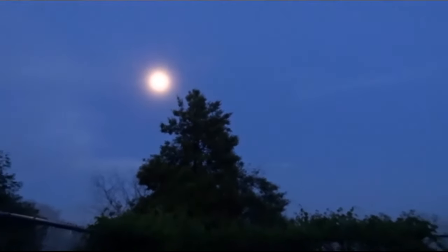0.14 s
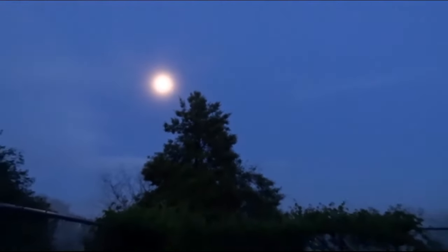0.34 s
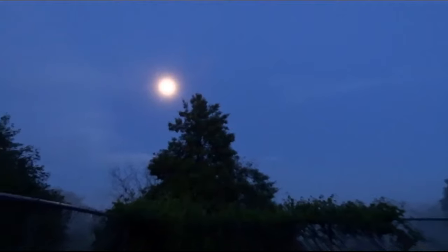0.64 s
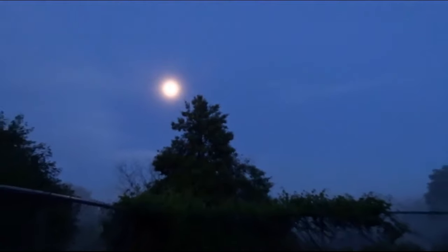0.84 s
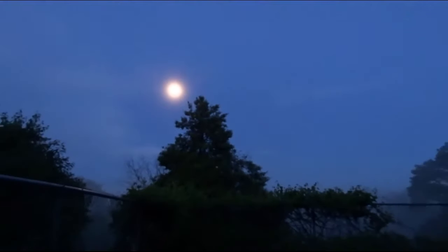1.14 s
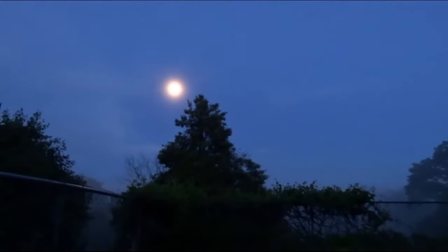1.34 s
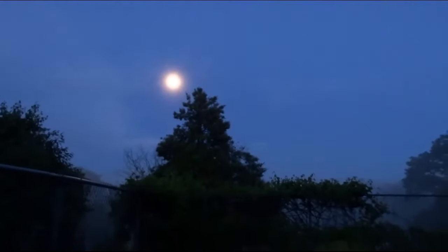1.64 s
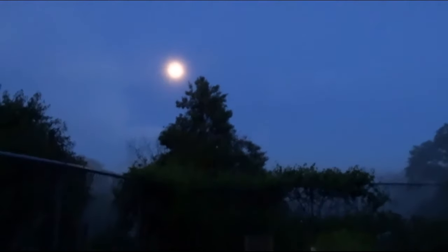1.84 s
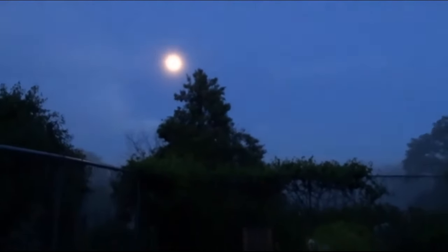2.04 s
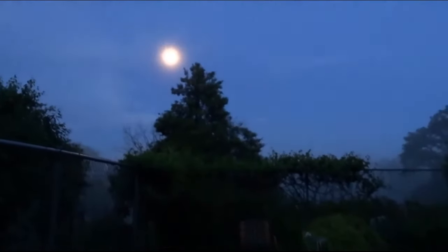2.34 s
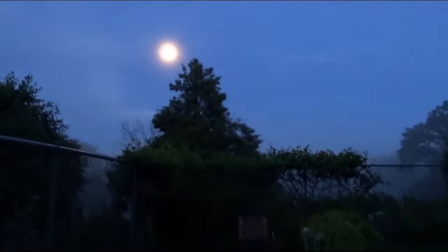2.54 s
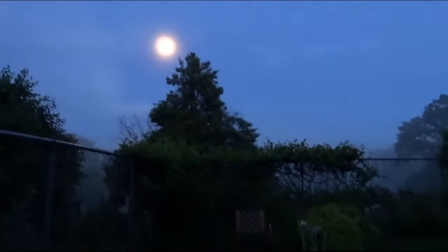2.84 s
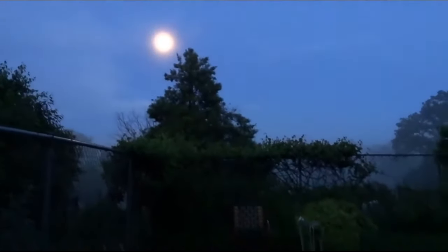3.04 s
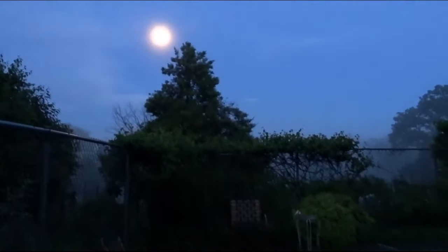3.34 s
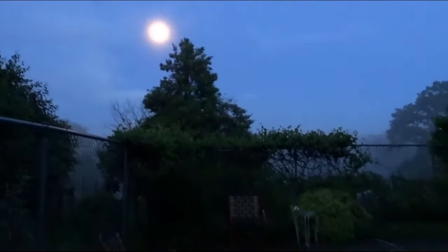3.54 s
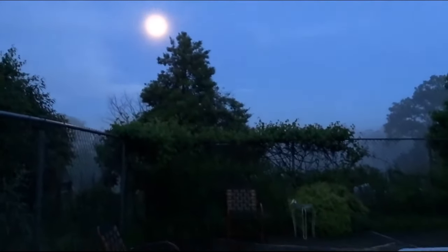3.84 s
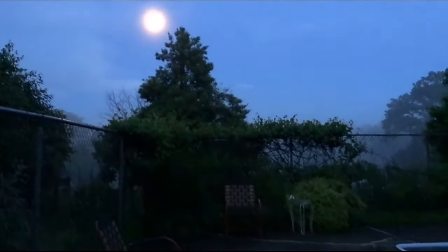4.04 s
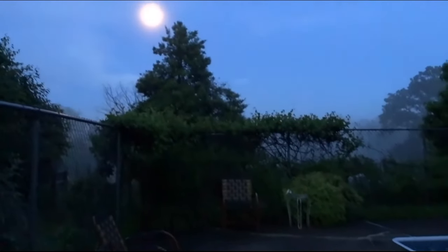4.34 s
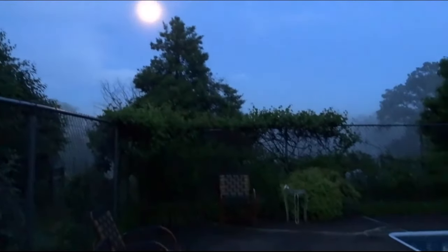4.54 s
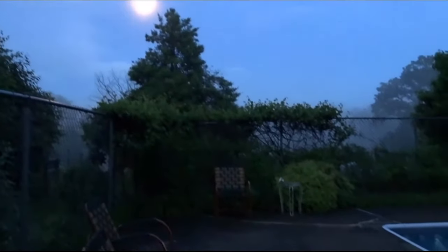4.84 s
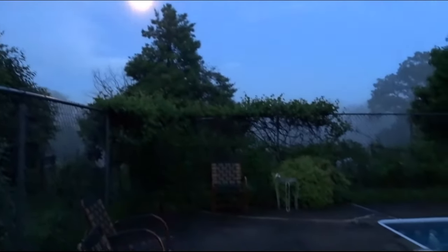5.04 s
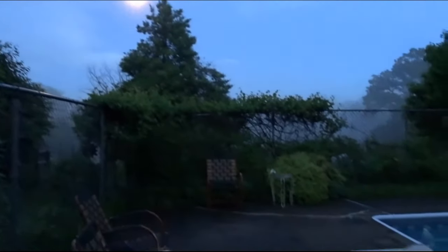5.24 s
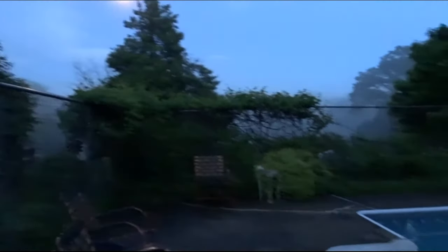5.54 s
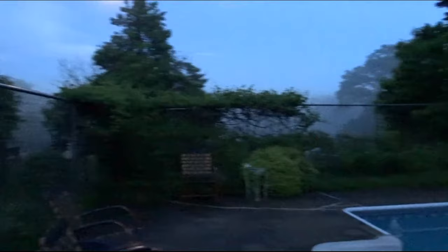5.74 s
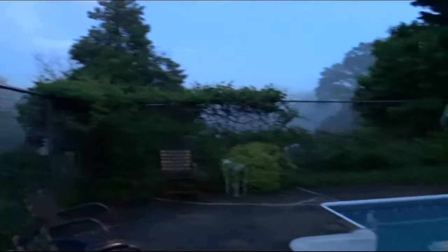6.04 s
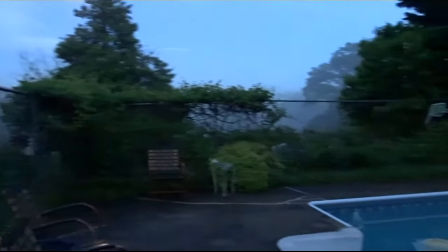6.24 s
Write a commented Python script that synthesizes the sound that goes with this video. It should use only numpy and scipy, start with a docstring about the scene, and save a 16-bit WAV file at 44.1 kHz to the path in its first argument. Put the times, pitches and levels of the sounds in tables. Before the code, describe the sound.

A faint, steady chorus of toads trills throughout, outdoors at dusk and slightly to the left, each trill a fast train of short rising pulses. Behind it are a high shimmer of far crickets and a low hum of distant traffic and machinery. One close cricket trills in four long runs, strongest from 4.3 to 6.2 seconds. A camera's zoom motor whirs softly from the start until 1.6 seconds. Between 1.3 and 1.9 seconds fingers knock lightly and rub on the camera body, with one tiny squeak near 1.7. The chorus swells a little around 1.9 seconds. Nearer toads stand out in short trills from 0.5 seconds, then in one long, louder trill from 2.9 to 5, followed by a brief lower one. Another cricket adds scattered single scrapes from 3 to 5.3 seconds. The chorus continues to the end at about 6.4 seconds.

```python
"""Toads trill together beyond a backyard at dusk, a few nearer voices pulsing out of the chorus.
Each trill is a train of short, rising pulses. One cricket scrapes its wings close by over many far
ones; machinery and traffic hum in the distance. A camera's zoom motor whirs at first, and fingers
tick, rub and squeak on the body as it stops. Levels in the tables are relative."""
import sys
import numpy as np
from scipy import signal
from scipy.fft import rfft, irfft
from scipy.io import wavfile
from scipy.ndimage import uniform_filter1d

SR = 44100
rng = np.random.default_rng(int(sys.argv[2]) if len(sys.argv) > 2 else 0)


def generate_wav(sig):
    """Save sig (samples, or channels by samples) to the path in sys.argv[1] as 16-bit PCM at SR."""
    pcm = np.round(np.clip(np.atleast_2d(sig).T, -1, 1) * 32767).astype(np.int16)
    wavfile.write(sys.argv[1], SR, pcm)


N = 281358
TIME = np.arange(N) / SR


def amp(db):
    """Decibels to gain."""
    return 10 ** (np.asarray(db) / 20)


def unit(x):
    """Scales to rms 1."""
    return x / np.sqrt(np.mean(x ** 2) + 1e-20)


def curve(rows, column=1):
    """One column of a time table as an automation curve."""
    rows = np.array(rows, float)
    return np.interp(TIME, rows[:, 0], rows[:, column])


def eq(points, hz):
    """Reads a spectrum table on a log-frequency axis."""
    f, value = np.transpose(points)
    return np.interp(np.log(hz + 1), np.log(f + 1), value)


def add(mix, start_s, sound):
    """Mixes a sound in at its cue."""
    part = mix[max(round(start_s * SR), 0):][:len(sound)]
    part += sound[:len(part)]


def bump(progress):
    """A smooth fade in and out as progress runs from 0 to 1."""
    return np.sin(np.pi * np.clip(progress, 0, 1)) ** 2


def drift(hz):
    """Random modulation of rms 1, rolling off above hz."""
    f = np.fft.rfftfreq(N, 1 / SR)
    return unit(irfft(rfft(rng.standard_normal(N)) * np.exp(-(f / hz) ** 2) * (f > 0), N))


def pan(left_db):
    """Stereo gains that put the left side left_db above the right."""
    half = np.atleast_1d(left_db) / 2
    return amp(np.array([half, -half]))


# Stereo width at the two microphone ports: freq_hz, correlation
PORT_LIKENESS = [(50, 1), (130, .98), (330, .68), (700, .77), (1200, .86), (2200, .86), (4300, .9),
                 (8000, .75), (11000, .55)]
# Their balance: freq_hz, left_minus_right_db
PORT_BALANCE = [(60, .2), (300, 1.2), (700, 2), (1500, 3), (4300, 2), (8000, .5)]

def noise(spectrum):
    """Coloured stereo noise of rms 1, as the two ports hear it."""
    hz = np.fft.rfftfreq(N, 1 / SR)
    left, other = rfft(rng.standard_normal((2, N)))
    likeness = eq(PORT_LIKENESS, hz)
    right = likeness * left + np.sqrt(1 - likeness ** 2) * other
    stereo = np.array([left, right]) * pan(eq(PORT_BALANCE, hz))
    return unit(irfft(stereo * amp(eq(spectrum, hz)), N))


def garden(x, wet_db, t60_s, width, count=3):
    """The direct sound plus scatter from trees and fence, which shifts as the camera moves."""
    t, wet = np.arange(SR // 3) / SR, 0
    for k in range(count):
        taps = rng.standard_normal((2, len(t))) * amp(-60 * t / t60_s) * (t > .002)
        mid, side = taps / np.linalg.norm(taps, axis=1, keepdims=True)
        tails = np.array([mid + width * side, mid - width * side])
        crossfade = np.sqrt(2 / count) * np.cos(np.pi * (2 * TIME + k / count))
        wet = wet + signal.oaconvolve((x * crossfade)[None], tails, axes=1)[:, :N]
    return (x + amp(wet_db) * wet) / np.sqrt(1 + amp(wet_db) ** 2)


def leveller(x, window=14001):
    """Evens out the slow level of a crowd and keeps its pulsing."""
    power = uniform_filter1d(uniform_filter1d(x.mean(0) ** 2, window), window // 2)
    return x / np.sqrt(abs(power) + 1e-12)


# Bed of distant traffic and night air: freq_hz, density_db
AIR_EQ = [(15, -31), (35, -5.5), (65, -5.5), (120, 1.5), (155, -5.5), (205, -6), (280, -12.5), (410, -18),
          (600, -10), (770, -7), (950, -19.5), (1500, -20.5), (2800, -27), (5800, -34), (11000, -38)]
# Swell of the traffic: time_s, level_db
TRAFFIC_SWELL = [(0, 0), (.7, 1), (1.35, 3), (1.6, 4.5), (2.2, 1.5), (3.2, 2), (4, 1), (4.5, 3), (5.5, 3.5),
                 (6.38, 1)]
# Hum of far machinery: pitch_hz, level_db
HUM_TONES = [(91, -81), (115, -72), (240, -73)]
# Swell of its deepest tone: time_s, level_db
DRONE_SWELL = [(0, -62.5), (1, -59), (1.7, -67), (2.4, -59), (2.9, -73), (3.4, -71), (3.8, -75), (4.2, -71),
               (4.7, -62.5), (5.4, -55.5), (6.38, -61)]

def town(drone_hz=47.3):
    """Traffic wash, a deep drone and a few wavering machine tones."""
    def tone(hz, wobble_rad):
        return unit(np.sin(2 * np.pi * hz * TIME + wobble_rad * drift(2.8)))

    wash = amp(-58 + curve(TRAFFIC_SWELL) + 1.18 * drift(28)) * noise(AIR_EQ)
    drone = amp(curve(DRONE_SWELL) + 1.3 * drift(3.7)) * tone(drone_hz, .84)
    hum = sum(amp(db) * tone(hz, .59) for hz, db in HUM_TONES)
    return wash + drone + hum


# Bed of far crickets: freq_hz, density_db
FAR_CRICKET_EQ = [(3000, -41), (3650, -16), (3950, -3), (4350, -2), (4700, -8), (5150, -22.5), (6200, -56),
                  (7500, -27), (8300, -19.5), (9200, -50)]

def far_crickets():
    """Many distant trills melt into a shimmering band."""
    return amp(-59.5 + .5 * drift(18) + drift(50)) * noise(FAR_CRICKET_EQ)


# Colour of the whir: freq_hz, density_db
MOTOR_EQ = [(400, -6), (1500, -8), (2800, -1.5), (4800, -35), (5500, -4), (6300, -11.5), (6900, -1),
            (7500, -6), (8040, 3.5), (8700, -5.5), (9450, -11), (10200, -8), (11000, -19)]
# The motor runs, then cuts out: time_s, level_db
MOTOR_FADER = [(0, -64), (1.1, -64.5), (1.5, -62), (1.56, -75), (1.6, -120)]

def zoom_motor(flutter_hz=67):
    """A small gear train whirs, fluttering as it turns."""
    flutter = 1 + .18 * np.sin(2 * np.pi * flutter_hz * TIME + drift(1.4))
    return amp(curve(MOTOR_FADER)) * flutter * noise(MOTOR_EQ)


# Finger cues: start_s, knock_db, scrape_db, scrape_length_s
TOUCHES = [(1.349, -44, -73, .01), (1.403, -41, -71, 0.0073), (1.485, -46, -75, .01),
           (1.639, -44.5, -67, 0.0085), (1.646, -57, -45, 0.0057), (1.669, -58, -61, 0.08),
           (1.706, -57, -54, 0.089), (1.751, -44.5, -66, 0.0065), (1.814, -59, -55, 0.017),
           (1.837, -61, -54, 0.017), (1.865, -58, -47, 0.0088)]
# Ring of the camera body: pitch_hz, level_db, t60_s
BODY_MODES = [(583, -8, 0.044), (783, 2, 0.023), (850, -6, 0.023), (1380, -27, .015)]
# Colour of a scrape: freq_hz, density_db
SCRAPE_EQ = [(200, 7), (800, 3), (1700, 4.5), (2700, 7), (3700, -2.5), (5200, 1.5), (6200, -4.5),
             (8000, 4.5), (9500, -7.5), (11000, -11)]

def fingers(attack_s=.0042):
    """Each touch knocks the camera body and scrapes over it in small slips."""
    knocks, pressure = np.zeros((2, N))
    t = np.arange(SR // 8) / SR
    ring = sum(amp(db - 60 * t / t60_s) * np.sin(2 * np.pi * hz * t) for hz, db, t60_s in BODY_MODES)
    ring *= 1 - np.exp(-t / attack_s)
    for start_s, knock_db, scrape_db, length_s in TOUCHES:
        add(knocks, start_s, amp(knock_db + 8.5) * ring)
        add(pressure, start_s, amp(scrape_db) * bump(t / length_s))
    slips = amp(2.7 * drift(290))
    return knocks + pressure * slips * noise(SCRAPE_EQ)


# Colour of a fingertip squeak: freq_hz, density_db
SQUEAK_EQ = [(2600, -18), (3200, -2), (3750, 2), (4200, 1), (5000, -19)]

def squeak(start_s=1.668, level_db=-50, length_s=.036):
    """A short, rough squeal of skin on plastic."""
    return amp(level_db) * bump((TIME - start_s) / length_s) * noise(SQUEAK_EQ)


# Loudest strokes of a stray cricket: time_s, level_db
STRAY_STROKES = [(3.004, -54), (3.683, -53), (4.088, -53), (4.289, -52), (4.606, -52), (4.694, -50),
                 (4.945, -56), (5.329, -55)]

def stray_cricket(length_s=.0166, top_hz=5150, end_hz=4150, faint_per_s=9, faint_db=-55.5):
    """Single rough wing strokes sweep down; fainter ones fall at random among the loudest."""
    out, progress = np.zeros(N), np.linspace(0, 1, int(length_s * SR))
    sweep_hz = top_hz + (end_hz - top_hz) * progress
    stroke = bump(progress) * np.sin(2 * np.pi * np.cumsum(sweep_hz) / SR)
    first_s, last_s = STRAY_STROKES[0][0], STRAY_STROKES[-1][0]
    span_s = last_s - first_s
    draws = rng.random((64, 2))[:round(faint_per_s * span_s)]
    faint = [(first_s + when * span_s, faint_db + 4 * (force - .5)) for when, force in draws]
    for time_s, level_db in STRAY_STROKES + faint:
        add(out, time_s - .004, amp(level_db) * stroke)
    grit = amp(3 * drift(400))
    return garden(out * grit, wet_db=-8, t60_s=.13, width=.4) * pan(2.5)


# Close cricket cues: start_s, end_s, strokes_per_s, wing_db, rasp_start_db, rasp_end_db
CRICKET_TRILLS = [(.156, 1.9, 35.74, -63.5, -78, -76.5), (1.918, 3.29, 35.02, -60, -69.5, -71.5),
                  (3.448, 4.21, 36.42, -62.5, -70.5, -78), (4.27, 6.21, 35.84, -56.3, -72.5, -72)]
# Rasp of its file: freq_hz, density_db
RASP_EQ = [(7000, -46), (7550, -18), (7800, -6), (8150, -3.5), (8450, 4.5), (8720, 2.5), (8950, -8),
           (9400, -44)]

def near_cricket(duty=.6, top_hz=4520, fall=.14, attack_s=.014, release_s=.055):
    """Each wing stroke rings and slows, so that its pitch falls; the file rasps an octave up."""
    cycle, wing_gain, rasp_gain = np.zeros((3, N))
    for start_s, end_s, rate, wing_db, *rasp_db in CRICKET_TRILLS:
        gate = np.clip(np.minimum((TIME - start_s) / attack_s, (end_s - TIME) / release_s), 0, 1)
        cycle += (gate > 0) * ((TIME - start_s) * rate % 1)
        wing_gain += gate * amp(wing_db)
        rasp_gain += gate * amp(np.interp(TIME, [start_s, end_s], rasp_db))
    progress = np.minimum(cycle / duty, 1)
    swell = unit(bump(progress ** .85)) * amp(.8 * drift(18))
    jitter = .009005 * drift(491) + .008 * drift(29.87)
    pitch_hz = top_hz * (1 - fall * progress ** 1.2 + jitter)
    phase = 2 * np.pi * np.cumsum(pitch_hz) / SR
    wings = amp(4) * wing_gain * swell * (np.sin(phase) + amp(-27) * np.sin(2 * phase))
    flicker = amp(1.3 * drift(20))
    rasp = rasp_gain * flicker * unit(swell + 3.6) * noise(RASP_EQ)  # pulses only shallowly
    return garden(wings, wet_db=-4.5, t60_s=.092, width=.57) * pan(2.6) + rasp


# Swell of both distant toad layers: time_s, main_note_db, low_note_db, main_pitch_hz
CHORUS = [(0.1, -54.5, -63, 2107), (0.45, -54.5, -66.5, 2137), (0.7, -52.5, -60.5, 2121),
          (1.05, -52.5, -57, 2129), (1.55, -54.5, -59, 2110), (1.87, -49, -56, 2135),
          (2.1, -49.5, -55.5, 2121), (2.7, -51, -56, 2121), (3.1, -49, -58.3, 2157),
          (3.55, -49.5, -58, 2183), (4.15, -51, -63, 2164), (4.5, -48, -56.5, 2113),
          (4.85, -48, -56.3, 2122), (5.2, -51.5, -58, 2048), (5.6, -51.5, -59, 2130),
          (6, -54.5, -61.5, 2157), (6.35, -50, -55, 2152)]
# Main and low notes, blurred by distance: freq_hz, density_db
MAIN_NOTE_EQ = [(1500, -55), (1740, -13), (1900, -7), (2150, 2), (2380, -5), (2540, -13.5), (2750, -24),
                (3000, -62)]
LOW_NOTE_EQ = [(750, -34), (920, -5.5), (1080, 1), (1220, -2.5), (1350, -11.5), (1600, -52)]

def farthest_toads(throb_hz=17):
    """At the back the trills run together into two soft bands, the lower one throbbing."""
    throb = 1 + .23 * np.sin(2 * np.pi * throb_hz * TIME + drift(.83))
    main = amp(curve(CHORUS, 1) - 6) * noise(MAIN_NOTE_EQ)
    low = amp(curve(CHORUS, 2) - 2.5) * throb * noise(LOW_NOTE_EQ)
    return main + low


def far_toads(count=18, detune=.045, rise=.12, duty=.4, waver=.018):
    """Each toad trills about 19 rising pulses a second on two notes an octave apart, then rests."""
    main_db, low_db, centre_hz = (curve(CHORUS, column) for column in (1, 2, 3))
    partials = np.zeros((3, N))
    for rank, (speed, offset, pace, turn) in zip(np.linspace(-1, 1, count), rng.random((count, 4))):
        pulse, cycle = np.divmod(TIME * (17.5 + 3 * speed) + offset, 1)
        stray, force_db = rng.standard_normal((512, 2))[pulse.astype(int)].T  # no two pulses are alike
        progress = np.minimum(cycle / duty, 1)
        trills_per_s = .4533 + .304 * pace
        gate = np.clip(1.43 + 2 * np.sin(2 * np.pi * (TIME * trills_per_s + turn)), 0, 1)
        swell = gate * amp(force_db) * bump(progress)
        pitch_hz = centre_hz * (1 + detune * (rank + rank ** 3) + waver * stray + rise * (progress - .5))
        low_phase = np.pi * np.cumsum(pitch_hz) / SR  # an octave under the main note
        partials += swell * np.sin(np.arange(1, 4)[:, None] * low_phase)
    low, main, third = (leveller(garden(p, wet_db=1, t60_s=.5, width=.64)) for p in partials)
    third *= amp(-23 + 2 * drift(4) - .5 * (main_db + 49.5))  # a faint overtone that swells less
    return amp(main_db - 2.5) * (main + third) + amp(low_db - 4.5) * low


# Foreground toad cues: start_s, end_s, starting_pulses_per_s, level_db, pitch_hz
TOAD_TRILLS = [(.466, .99, 20.3, -51, 2160), (1.22, 1.47, 13.6, -47.5, 2110),
               (1.699, 2.147, 18.94, -47.5, 2114), (2.216, 2.85, 20.42, -50, 2107),
               (2.907, 4.96, 19.88, -45, 2152), (5.013, 5.27, 17.5, -45.5, 1992)]
# Pulses forced out harder: time_s, boost_db
ACCENTS = [(2.907, 0), (3.009, 2.5), (3.056, 5.5), (3.108, 6), (3.46, 7), (4.24, 4.5), (4.776, 2.5),
           (5.127, 3)]

def near_toads(pulse_s=.025, rise=.17, arch=.025, waver=.018, slowing_hz_per_s=.65):
    """Each trill arches in pitch and slows as the toad tires; each pulse swells, climbs and fades."""
    out, progress = np.zeros(N), np.linspace(0, 1, int(pulse_s * SR))
    partials = amp([-18, 0, -27, -21])  # low note, main note, two overtones
    draws = rng.standard_normal((len(TOAD_TRILLS), 64, 3))
    for (start_s, end_s, rate, level_db, pitch_hz), pulses in zip(TOAD_TRILLS, draws):
        time_s = start_s
        for force, stray, offset in pulses:
            if time_s > end_s:
                break
            bend = arch * (np.sin(np.pi * (time_s - start_s) / (end_s - start_s)) - .5)
            sweep_hz = pitch_hz * (1 + bend + waver * stray) * (1 + rise * (progress - .5))
            low_phase = np.pi * np.cumsum(sweep_hz) / SR + 2 * np.pi * offset
            tone = sum(gain * np.sin(k * low_phase) for k, gain in enumerate(partials, 1))
            accent_db = sum(boost_db for at_s, boost_db in ACCENTS if abs(at_s - time_s) < .5 / rate)
            swell = amp(level_db + accent_db + 1.5 * force + 1) * bump(progress)
            add(out, time_s - pulse_s / 2, swell * tone)
            time_s += 1 / (rate - slowing_hz_per_s * (time_s + .5 / rate - start_s))
    return garden(out, wet_db=-6, t60_s=.24, width=.31)


# Near and far toads lean left as the camera turns: time_s, left_minus_right_db
TOAD_PAN = [(0, 6), (1.5, 6.5), (3, 5.5), (4.6, 7), (5.6, 4.5), (6.38, 7.5)]

def scene():
    """All the voices of the yard and the camera's own noises."""
    left_db = curve(TOAD_PAN)
    toads = (far_toads() + near_toads()) * pan(left_db) + farthest_toads() * pan(left_db - 8)
    crickets = near_cricket() + stray_cricket() + far_crickets()
    return toads + crickets + town() + zoom_motor() + fingers() + squeak()


def record(dry, cutoff_hz=11030):
    """The camera's steep high cut."""
    lowpass = signal.firwin(601, cutoff_hz, window=("kaiser", 8), fs=SR)
    return signal.oaconvolve(dry, lowpass[None], "same")


dry = scene()
out = record(dry)
generate_wav(out)
```